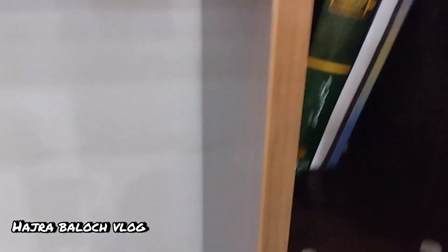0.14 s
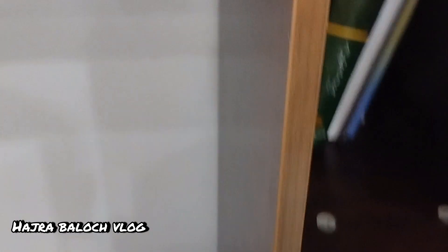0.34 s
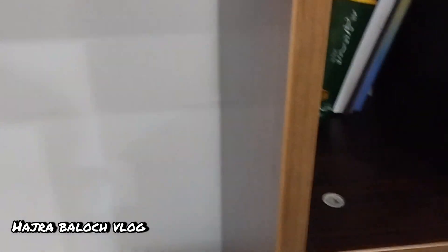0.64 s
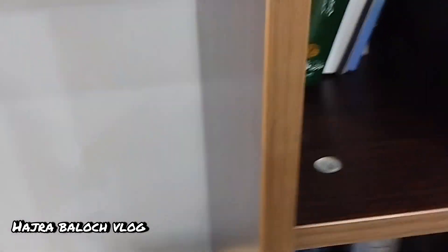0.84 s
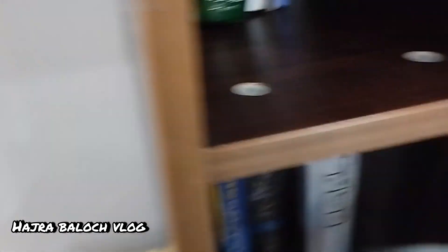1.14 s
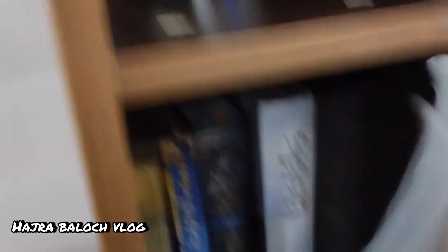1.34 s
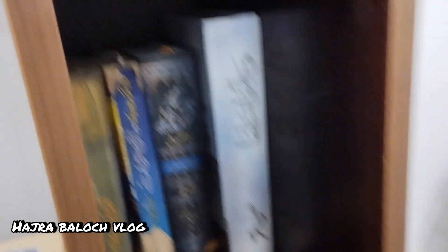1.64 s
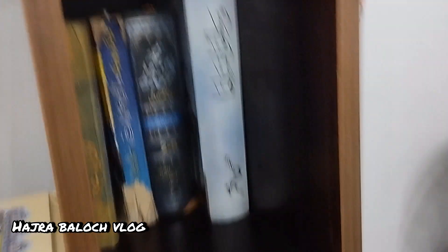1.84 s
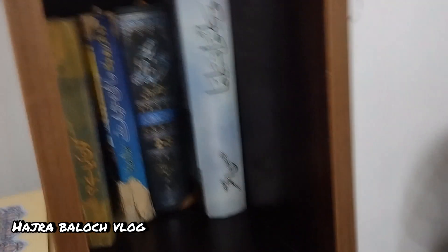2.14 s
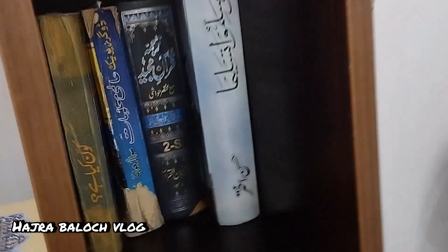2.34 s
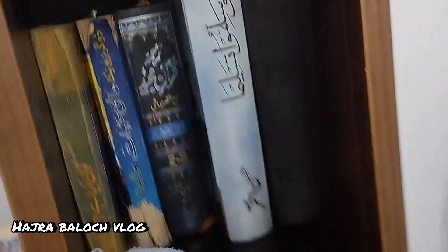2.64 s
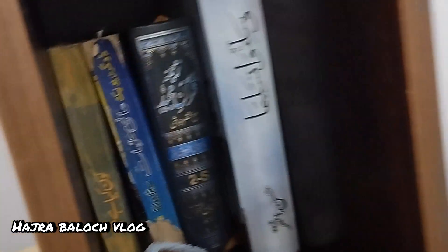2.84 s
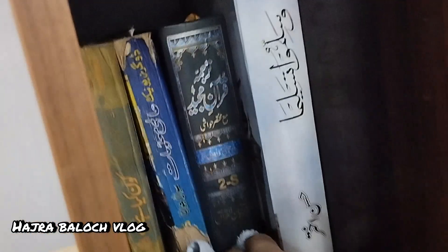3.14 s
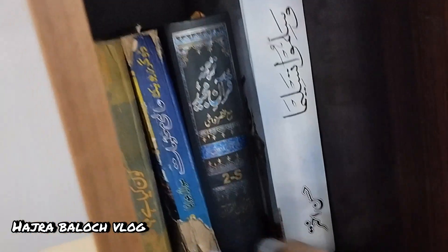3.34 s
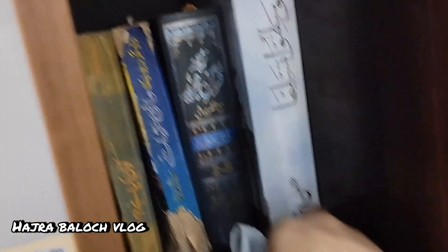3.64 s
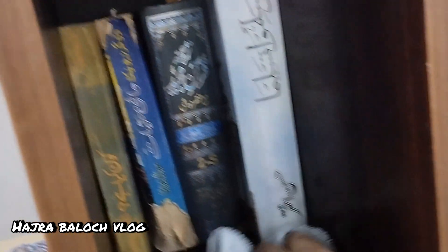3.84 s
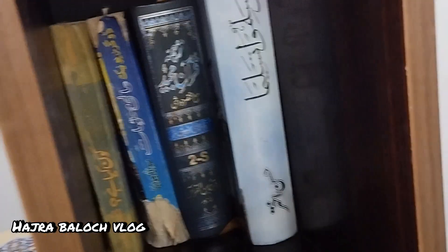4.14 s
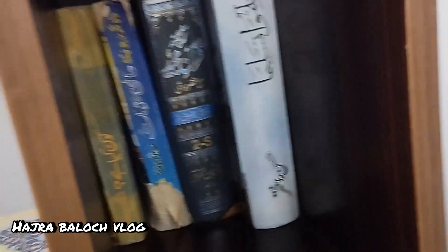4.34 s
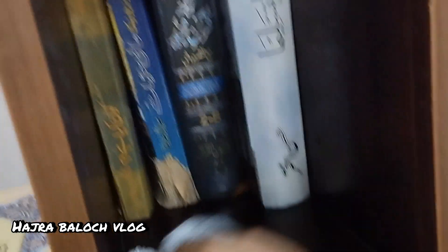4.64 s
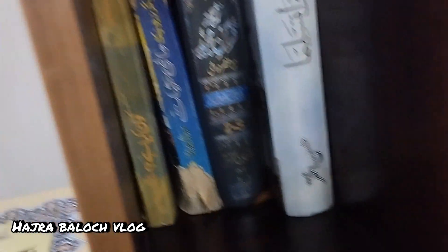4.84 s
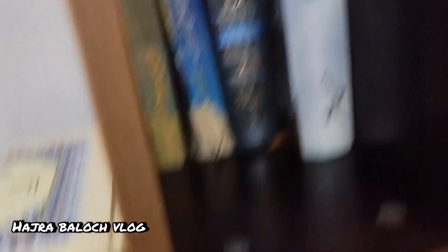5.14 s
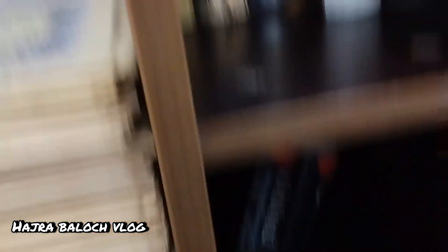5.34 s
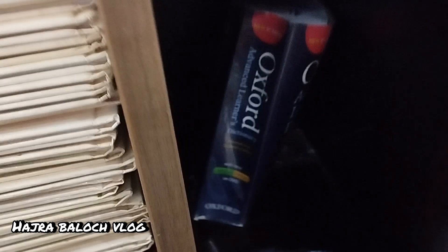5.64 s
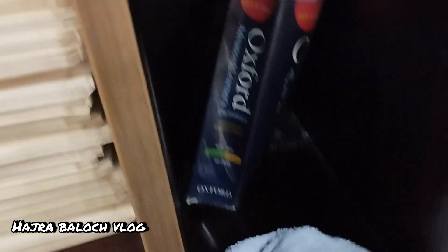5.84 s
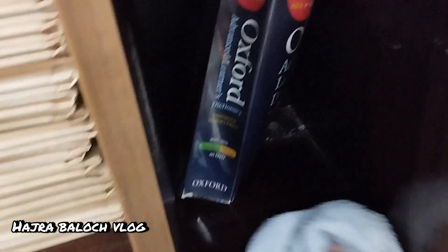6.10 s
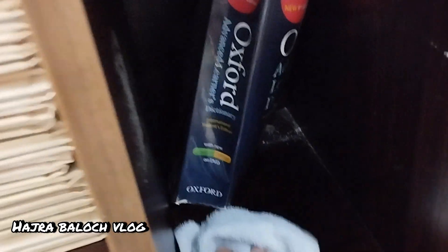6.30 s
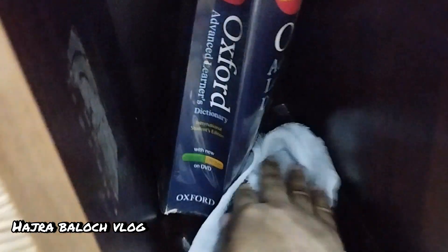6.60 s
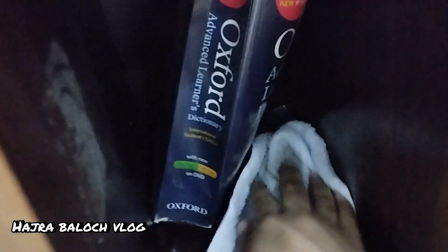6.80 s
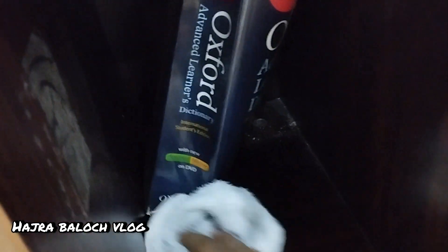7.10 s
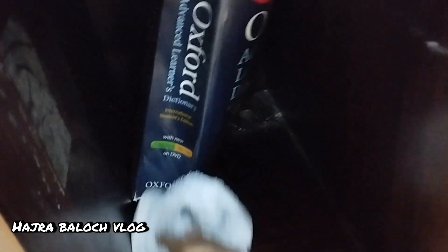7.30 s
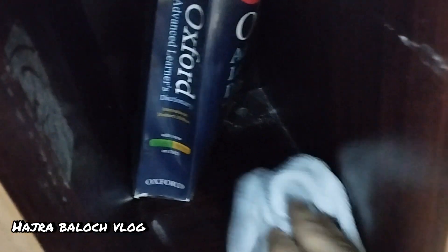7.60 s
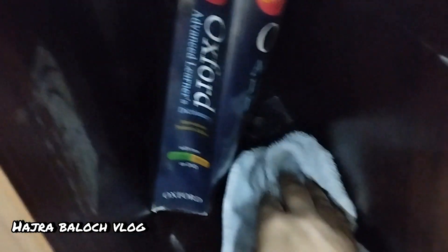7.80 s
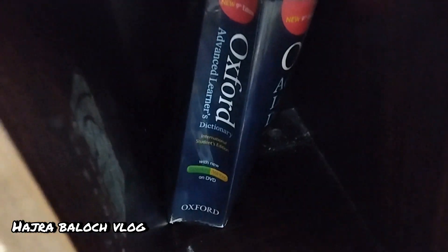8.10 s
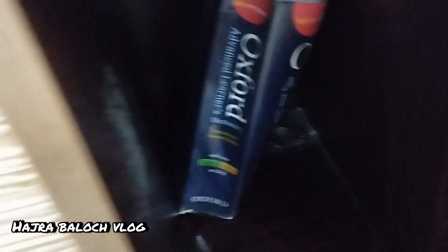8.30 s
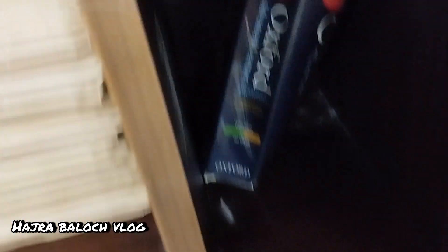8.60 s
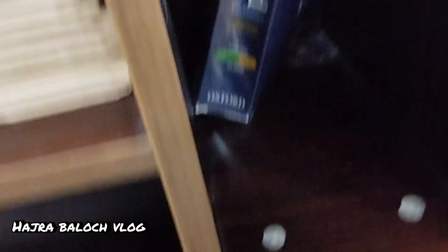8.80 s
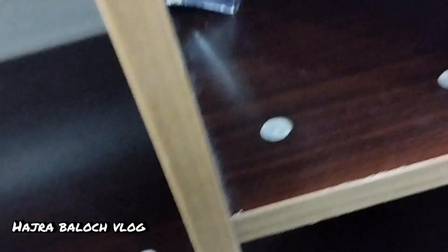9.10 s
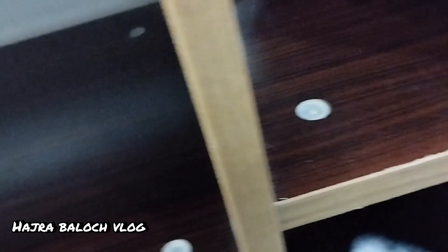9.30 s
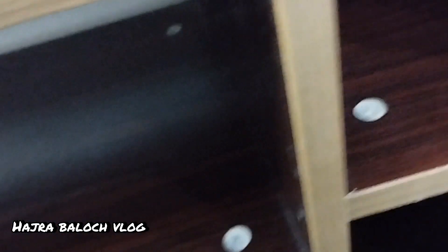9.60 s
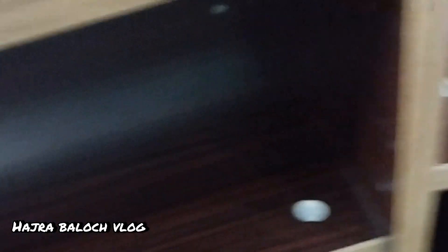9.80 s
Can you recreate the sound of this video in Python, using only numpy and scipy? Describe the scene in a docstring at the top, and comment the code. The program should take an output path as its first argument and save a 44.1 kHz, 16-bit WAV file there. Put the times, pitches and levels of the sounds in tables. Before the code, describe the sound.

Someone dusts a wooden bookcase indoors, heard from very near. It opens with three sharp, hollow knocks, each led by a little air thump on the microphone. Much quieter wiping follows: short swishes of cloth with a low rubbing drone from the shelves, a few brief scrapes, dull bumps and small clicks against books. The cloth snaps once late on. A faint low rumble fills the small room.

```python
"""A small room, close to a wooden book cabinet that is being dusted.
Three hard knocks come first, each led by a puff of air; they ring the frame, boards and thin panels.
Then a cloth wipes two shelves in short strokes: its fibres hiss, and scrape where it is pressed hard.
The boards drone under the cloth and thump when the hand bumps them.
Nails and book covers tick now and then, over the low rumble of the house."""
import sys
import numpy as np
from scipy import signal
from scipy.fft import rfft, irfft, next_fast_len
from scipy.io import wavfile
from scipy.ndimage import uniform_filter1d, map_coordinates

SR = 44100
rng = np.random.default_rng(int(sys.argv[2]) if len(sys.argv) > 2 else 0)


def log_audio(samples):
    """Write samples as a 16-bit WAV file to the path given in sys.argv[1]."""
    # one column per channel
    frames = np.atleast_2d(samples).T
    # limit to full scale, then quantise
    limited = np.clip(frames, -1, 1)
    pcm = np.round(limited * 32767).astype(np.int16)
    wavfile.write(sys.argv[1], SR, pcm)


N = 438794


# Wood hitting wood, several hits to a knock. A "fade" is the time a sound takes to drop by 60 dB.
# (time [s], thud [dB], boom [dB], clack [dB], crack [dB], board pitch [Hz], panel pitch [Hz],
# board fade [s])
HARD_HITS = [(0.201, -31.5, -31.5, -26, -39.5, 221, 470, 0.049),
             (0.2075, -32.5, -38.5, -31.5, -25, 244.6, 757, 0.28),
             (0.7644, -20, -27, -29.5, -44, 176, 414, 0.016),
             (0.769, -20, -35.5, -26, -32.5, 196, 464, .04), (0.807, -37, -21, -27.5, -35, 300, 527, 0.066),
             (0.81, -17.5, -23, -31, -33.5, 250, 603, 0.077),
             (1.3726, -30, -14, -36, -47, 251.8, 710, 0.092),
             (1.377, -42, -24.5, -39, -41.5, 258, 690, 0.043),
             (1.387, -42, -29.5, -28.5, -42.5, 243, 760, 0.061),
             (5.622, -32.5, -25, -47, -60.5, 228, 790, 0.057),
             (7.552, -35.5, -35.5, -44.5, -52.5, 210, 505, 0.064)]

def knocks(soft_db=14):
    """Each hit or bump cracks where it lands and rings the frame, the struck board and the panels."""
    track, t = np.zeros((2, N)), np.arange(int(SR * .35)) / SR
    for start, thud_db, boom_db, clack_db, crack_db, board_hz, panel_hz, fade in HARD_HITS + bumps():
        # a weak crack means a soft hit: it builds slowly, lasts longer and is duller
        softness = 0.5 + max(clack_db - crack_db, 0) / soft_db
        thud = amp(thud_db - 2) * frame_thud(t)
        boom = amp(boom_db - 2.78) * board_boom(t, board_hz, fade)
        clack = amp(clack_db - 1.4) * panel_clack(t, panel_hz, softness)
        crack = amp(crack_db + 2) * contact_crack(t, softness) * amp([[-1.4], [1.6]])
        add(track, start, echoed(thud + boom + clack, echo_db=-9.5) + echoed(crack, echo_db=-10))
    return track


# The frame's own notes: (pitch [Hz], level [dB], fade [s])
FRAME_NOTES = [(135, -1, 0.099), (169.3, -12.5, 0.23), (92.5, -2.5, 0.056)]

def frame_thud(t):
    """The whole frame shakes with a few low notes."""
    return ring(FRAME_NOTES, t, attack=0.00081, scatter_db=4.5, detune=0.012)


def board_boom(t, hz, fade, sag=.06, sag_s=0.023):
    """The struck board rings, and its pitch sags as its swing dies down."""
    notes = [(hz, 0, fade), (hz * 1.14, -13, 0.89 * fade)]
    sagging_time = t * (1 + sag * (sag_s - t) / (sag_s + t))
    return ring(notes, sagging_time, attack=0.0026, scatter_db=1.5, detune=0.016)


# Where a thin panel rings: (pitch [times the panel's pitch], width [Hz], level [dB])
PANEL_PEAKS = [(1, 95, 2), (.64, 55, -4.5), (1.5, 810, -18.5), (2.2, 910, -22)]

def panel_clack(t, hz, softness, base_fade=0.036, dull_hz=3200):
    """The brief push of a hit rings a thin panel."""
    onset = 1 - np.exp(-t / (0.00091 * softness))
    push = burst(t, base_fade * np.sqrt(softness))[:1] * onset
    peaks = [(hz * multiple, width, db) for multiple, width, db in PANEL_PEAKS]
    clack = filtered(push, lambda f: resonance(peaks, f) / (1 + 1j * f * softness / dull_hz) ** 2)
    return unit_start(clack)


# The crack's tone, from bass to treble: (frequency [Hz], level [dB])
CRACK_TONE = [(200, -24), (600, -2.5), (1000, 1), (1600, -2.5), (2000, 0.5), (2500, -2), (3200, 1),
              (4200, -5.5), (5200, -5), (7200, -15.5), (9300, -15), (11000, -20), (14500, -9)]

def contact_crack(t, softness, chatter_fade=0.035, snap_fade=0.0066, snap_db=6, bright_hz=24000):
    """The first touch is sharpest; the two surfaces then chatter for a moment."""
    chatter = burst(t, chatter_fade) + amp(snap_db) * burst(t, snap_fade)
    dulled = filtered(chatter, lambda f: 1 / (1 + 1j * f * softness ** 2 / bright_hz))
    crack = signal.fftconvolve(dulled, shortest_click(CRACK_TONE)[None], axes=1)
    return unit_start(crack[:, :len(t)])


# Soft bumps of the hand: (time [s], boom [dB], clack [dB], board pitch [Hz])
HAND_BUMPS = [(0.134, -43, -55.5, 195), (0.1887, -28.5, -45, 205), (0.7152, -38, -48.5, 189),
              (1.343, -38.5, -45.5, 194), (1.417, -29.5, -44, 223), (1.99, -32.5, -58, 274),
              (2.016, -36.5, -61, 203), (4.808, -45.5, -62, 298), (2.185, -59, -51.5, 273),
              (2.491, -40, -53, 306), (2.778, -42, -40, 290), (2.797, -45, -45, 292),
              (2.835, -42, -52, 193.5), (3.582, -44.5, -74, 181), (4.24, -45.5, -56, 295),
              (4.454, -57, -60.5, 280), (4.502, -46.5, -61, 264), (4.751, -43.5, -55, 296),
              (5.042, -39.5, -51, 294.6), (5.6, -40.5, -59, 269), (5.642, -35, -59, 245),
              (5.659, -36.5, -60, 270.6), (6.175, -43, -59, 239.5), (6.625, -44.5, -52, 244),
              (6.664, -41, -53.5, 239), (7.571, -35.5, -57, 246), (8.369, -33.5, -54, 253),
              (8.44, -34, -54.5, 257), (8.745, -46.5, -49, 215), (8.762, -46, -48, 184.5),
              (8.787, -49.5, -53.5, 183), (9.323, -51, -52, 288), (9.378, -46.5, -59, 194),
              (9.89, -47.5, -62.5, 361)]

def bumps(panel_ratio=2.4, mute_db=-25, frame_hz=194, db_per_octave=-25.5, fade=0.12):
    """List the padded hand's hits: they hardly crack, and lower ones shake the frame more."""
    hits = []
    for start, boom_db, clack_db, hz in HAND_BUMPS:
        thud_db = boom_db + db_per_octave * np.log2(hz / frame_hz)
        hits.append((start, thud_db, boom_db, clack_db, clack_db + mute_db, hz, panel_ratio * hz, fade))
    return hits


# Spots the hand works on, each with its own board and ringing hollow:
# (start [s], board pitch [Hz], hollow pitch [Hz], hollow width [Hz], hollow level [dB])
WIPED_SPOTS = [(0, 258, 2650, 507, -5.5), (2.319, 329.6, 729, 70.5, 1.5), (3.1, 296.2, 734, 55, 7),
               (5.4, 250.6, 1640, 918, -9), (8.56, 386, 578, 411, -5)]

def cloth(grip_db=3, board_width_hz=44):
    """The cloth's uneven drag makes the shelf drone, while the hollow colours its hiss."""
    hiss_db, scuff_db, drone_db = stroke_levels()
    hiss = fibre_hiss(hiss_db, scuff_db)
    drag = stereo(rng.standard_normal((2, N))) * amp(grip_db * wobble(90))
    rub = np.zeros((2, N))
    edges = [int(spot[0] * SR) for spot in WIPED_SPOTS] + [N]
    for (_, board_hz, *hollow), a, b in zip(WIPED_SPOTS, edges, edges[1:]):
        drone = unit(band(drag[:, a:b], board_hz, board_width_hz)) * amp(drone_db[a:b] - 1.4)
        rub[:, a:b] = drone + filtered(hiss[:, a:b], lambda f: 1 + resonance([hollow], f))
    return echoed(rub, echo_db=-11.5) * amp([[.4], [-.4]])


# Strokes of the cloth:
# (fastest moment [s], speeding up [s], slowing down [s], hiss [dB], scuff [dB], drone [dB])
CLOTH_STROKES = [(.16, 0.11, 0.11, -66, -69.5, -53), (.315, 0.028, 0.1, -58, -55.5, -50.5),
                 (.72, 0.2, 0.14, -67, -66.5, -61), (1.136, 0.07, 0.062, -58, -59, -65),
                 (1.26, 0.11, 0.36, -65, -60.5, -55), (1.57, 0.17, 0.25, -68.5, -72.5, -65.5),
                 (1.885, 0.11, 0.054, -66.5, -63.5, -57), (2.079, 0.21, 0.23, -71, -66.5, -53),
                 (2.561, 0.17, 0.29, -60.5, -59, -43.5), (2.791, 0.16, 0.069, -53, -55, -53),
                 (2.96, 0.05, 0.19, -62, -60.5, -58), (3.379, 0.14, 0.095, -62.5, -63, -55.5),
                 (3.589, 0.097, 0.041, -63.5, -66.5, -57), (4.0, 0.26, 0.072, -58.5, -61, -57),
                 (4.246, 0.17, 0.096, -57.5, -57, -48.5), (4.63, .14, 0.071, -63, -60, -52.5),
                 (4.79, 0.14, 0.11, -59.5, -61, -52.5), (5.051, 0.16, 0.056, -63.5, -62, -44.5),
                 (5.94, 0.087, 0.038, -63, -65, -56.5), (6.181, 0.13, 0.13, -62.5, -61.5, -49),
                 (6.39, 0.091, 0.15, -59, -58.5, -44.5), (6.65, 0.17, 0.04, -62, -58.5, -51.5),
                 (6.88, 0.28, 0.38, -62, -61.5, -57.5), (7.37, 0.17, 0.22, -61.5, -60, -53.5),
                 (7.64, .1, 0.13, -65.5, -60.5, -51), (8.0, 0.17, 0.096, -61, -60, -53.5),
                 (8.18, 0.28, 0.09, -65.5, -67, -55.5), (8.36, 0.14, 0.12, -58, -55.5, -45),
                 (9.06, 0.12, 0.065, -67.5, -67, -64), (9.379, 0.14, 0.086, -71, -66, -54.5),
                 (9.52, 0.093, 0.067, -60, -59, -59), (9.86, 0.31, 0.062, -66, -62.5, -64)]
# Each layer grows as the hand's speed raised to a power: (hiss [power], scuff [power], drone [power])
SPEED_POWERS = (0.8, 1.22, 2.3)

def stroke_levels(creep=.075, creep_s=.15):
    """Hiss, scuff and drone in dB: they swell as the hand speeds up and sink as it slows."""
    t = np.arange(0, N, 32) / SR
    energy = np.full((3, len(t)), 1e-12)
    for fastest, rise, fall, *levels_db in CLOTH_STROKES:
        progress = np.clip((t - fastest) / np.where(t < fastest, rise, fall), -1, 1)
        # the cloth creeps a little before and after the stroke
        creeping = creep * np.exp(-np.abs(t - fastest) / creep_s)
        speed = np.maximum(np.cos(np.pi / 2 * progress), creeping)
        energy += np.array([amp(db) * speed ** power for db, power in zip(levels_db, SPEED_POWERS)]) ** 2
    return [np.interp(np.arange(N) / SR, t, 10 * np.log10(layer)) for layer in energy]


# The tone of fibres sliding on wood: (frequency [Hz], level [dB])
FIBRE_TONE = [(100, 1.5), (190, 7.5), (420, 2.5), (680, 4), (1100, -1.5), (2200, -6), (5600, -9),
              (8200, -20), (9500, -14), (11200, -21), (13000, -11), (15500, -12)]

def fibre_hiss(hiss_db, scuff_db, catches_per_s=350, catch_db=-7, flutter_db=1.3, split_hz=2400):
    """Countless fibres slip and a few catch, making a low scuff and a fine, high hiss."""
    catches = tiny_catches(catches_per_s, N)
    slips = rng.standard_normal((2, N)) + amp(catch_db) * unit(catches)
    fibres = unit(filtered(stereo(hand_gap(slips)), lambda f: amp(along(FIBRE_TONE, f))))
    scuff = filtered(fibres, lambda f: treble_cut(f, split_hz))
    hiss = fibres - scuff
    return (hiss * amp(hiss_db) + scuff * amp(scuff_db)) * amp(5 + flutter_db * wobble(60))


def hand_gap(x, depth_db=2.0):
    """The gap under a moving hand keeps changing shape, so peaks come and go in the rub."""
    spectrum = signal.stft(x, nperseg=512)[2]
    patches = uniform_filter1d(rng.standard_normal(spectrum.shape[1:]), size=4, axis=0)  # across pitch
    patches = uniform_filter1d(patches, size=20, axis=1)  # across time
    return signal.istft(spectrum * amp(depth_db * unit(patches)), nperseg=512)[1][:, :N]


# Firm presses of the cloth: (middle [s], half length [s], level [dB], pitch [Hz])
FIRM_PRESSES = [(1.247, 0.055, -64, 4860), (2.718, .03, -51, 1200), (4.792, 0.055, -56, 1760),
                (5.645, .025, -60, 2820), (6.642, 0.035, -55, 2980)]

def scrapes(slips_per_s=2500, width_ratio=0.69):
    """Pressed hard, the cloth sticks and slips in a quick, uneven run of tiny catches."""
    track, t = np.zeros((2, N)), np.arange(8192) / SR
    for middle, half, db, hz in FIRM_PRESSES:
        rasp = band(tiny_catches(slips_per_s, len(t)), hz, width_ratio * hz)
        pressure = np.sin(np.pi / 2 * np.minimum(t / half, 2))
        add(track, middle - half, echoed(amp(db) * pressure * unit(rasp), echo_db=-11))
    return track


# Taps of nails, hard edges and book covers: (time [s], level [dB], pitch [Hz])
LIGHT_TAPS = [(0.142, -44, 1980), (0.207, -6.5, 3900), (1.494, -43, 2400), (1.6073, -42, 3180),
              (1.991, -43.5, 2760), (2.492, -42.5, 1820), (3.765, -50.5, 4000), (4.241, -36, 1290),
              (4.959, -53, 4500), (5.067, -45, 4000), (8.37, -37, 1306)]

def ticks(fade=0.014, width_hz=2200):
    """A light, hard touch makes a very short noise around one pitch."""
    track, t = np.zeros((2, N)), np.arange(SR // 4) / SR
    for start, db, hz in LIGHT_TAPS:
        touch = rng.standard_normal((2, len(t))) * amp(-60 * t / fade)
        tick = band(touch, hz, width_hz)
        add(track, start, echoed(amp(db) * tick / np.abs(tick).max(), echo_db=-15))
    return track


# Dry snaps in the cloth: (time [s], level [dB])
CLOTH_SNAPS = [(7.199, -38.5), (7.201, -38)]

def snaps(fade=0.033, bass_cut_hz=1500):
    """The cloth snaps with a broad, bright burst of noise."""
    track, t = np.zeros((2, N)), np.arange(SR // 4) / SR
    for start, db in CLOTH_SNAPS:
        noise = rng.standard_normal(len(t)) * amp(-60 * t / fade)
        snap = filtered(noise, lambda f: f / (f - 1j * bass_cut_hz))
        add(track, start, echoed(amp(db) * snap / np.abs(snap).max(), echo_db=-20))
    return track


# Air pushed across the microphone:
# (middle [s], half length [s], right level [dB], left compared with right [dB])
AIR_PUFFS = [(0.158, 0.013, -22, -24), (0.727, 0.0095, -16.5, -21), (1.336, 0.0049, -30, -2)]

def puffs():
    """A quick movement close by pulls and then pushes the air, mostly on the right."""
    track, t = np.zeros((2, N)), np.arange(N) / SR
    for middle, half, db, left_db in AIR_PUFFS:
        progress = (t - middle) / half
        track += amp([[db + left_db], [db]]) * progress * np.exp((1 - progress ** 2) / 2)
    return track


# How long the room's echo lasts: (frequency [Hz], fade [s])
ECHO_FADES = [(100, 0.32), (300, 0.31), (1000, 0.23), (4000, 0.22), (13000, 0.19)]

def echoed(x, echo_db, build_s=0.0016):
    """The room adds a short echo to a sound; the treble dies first."""
    hz, t, noise = signal.stft(rng.standard_normal((2, SR // 2)), SR, nperseg=256)
    fading = amp(-60 * t / along(ECHO_FADES, hz)[:, None])
    tail = signal.istft(noise * fading * (1 - np.exp(-t / build_s)), SR, nperseg=256)[1]
    tail = stereo(tail / np.linalg.norm(tail[0]))
    return x + amp(echo_db) * signal.fftconvolve(np.atleast_2d(x), tail, axes=1)[:, :x.shape[-1]]


# The tone of the quiet house: (frequency [Hz], level [dB])
HOUSE_TONE = [(25, -10), (44, 3), (72, -2), (125, -12), (290, -19), (420, -24.5), (850, -35), (3800, -43),
              (10000, -54.5), (15000, -47.5)]

def house_rumble(db=-50, drift_db=1.93):
    """The house rumbles low under a faint hiss, and the level drifts a little."""
    noise = filtered(stereo(rng.standard_normal((2, N))), lambda f: amp(along(HOUSE_TONE, f)))
    return amp(db + drift_db * wobble(2.7)) * unit(noise)


# How alike left and right sound: (frequency [Hz], likeness [0 to 1])
LIKENESS = [(60, 0.51), (300, 0.88), (640, 0.35), (1400, 0.081), (3000, 0.011)]

def stereo(pair):
    """Two unrelated signals become left and right: alike in the bass, unrelated in the treble."""
    angle = lambda hz: np.arccos(np.clip(along(LIKENESS, hz), -1, 1)) / 2
    mid, side = filtered(pair, lambda hz: np.array([np.cos(angle(hz)), np.sin(angle(hz))]))
    return np.array([mid + side, mid - side])


def ring(notes, t, attack, scatter_db, detune, side_db=1.47):
    """Fading notes, a little different on each hit and unequal in left and right."""
    total = 0
    for hz, db, fade in notes:
        level, shift, side = rng.standard_normal(3)
        wave = np.sin(2 * np.pi * hz * (1 + detune * shift) * t)
        note = amp(db + scatter_db * level - 60 * t / fade) * wave
        total = total + note * amp(side_db * side * np.array([[1], [-1]]))
    return unit_start(total * (1 - np.exp(-t / attack)))


def burst(t, fade):
    """Stereo noise that dies away."""
    return stereo(rng.standard_normal((2, len(t)))) * amp(-60 * t / fade)


def tiny_catches(per_s, size):
    """Clicks at random times, with random strengths."""
    return (rng.random(size) < per_s / SR) * rng.standard_normal((2, size))


def shortest_click(tone, size=2048):
    """The shortest click that has this tone, with energy 1."""
    cepstrum = irfft(np.log(amp(along(tone, np.fft.rfftfreq(size, 1 / SR)))))
    # folding the second half onto the first moves the energy to the start
    cepstrum[1:size // 2] *= 2
    cepstrum[size // 2 + 1:] = 0
    click = irfft(np.exp(rfft(cepstrum)))
    return click / np.linalg.norm(click)


def resonance(peaks, f):
    """How something with these ringing peaks answers at frequency f."""
    return sum((-1) ** k * amp(db) * 1j * f * width / (hz * hz - f * f + 1j * f * width)
               for k, (hz, width, db) in enumerate(peaks))


def treble_cut(f, hz):
    """A gain that falls away above hz."""
    return 1 / (1 + (f / hz) ** 4)


def band(x, hz, width):
    """Keep the part of a sound around one pitch."""
    return filtered(x, lambda f: resonance([(hz, width, 0)], f) * treble_cut(f, 2 * hz))


def filtered(x, response):
    """Apply a gain that depends on frequency."""
    n = x.shape[-1]
    padded = next_fast_len(n + SR // 10)
    return irfft(rfft(x, padded) * response(np.fft.rfftfreq(padded, 1 / SR)), padded)[..., :n]


def wobble(rate):
    """A smooth random curve through rate points a second."""
    return map_coordinates(rng.standard_normal(int(N * rate / SR) + 4), [np.arange(N) * rate / SR])


def along(points, hz):
    """Read between (frequency, value) points on a log axis."""
    f, values = np.transpose(points)
    return np.interp(np.log(hz + 1), np.log(f + 1), values)


def amp(db):
    """Decibels to gain."""
    return 10 ** (np.asarray(db) / 20)


def unit(x):
    """Scale to an average (rms) level of 1."""
    return x / np.sqrt(np.mean(x ** 2) + 1e-20)


def unit_start(x):
    """Scale so the first 30 ms have an average (rms) level of 1."""
    return x / np.sqrt(np.mean(x[..., :int(.03 * SR)] ** 2) + 1e-20)


def add(track, start, sound):
    """Mix a sound into the track at a time in seconds."""
    part = track[:, max(round(start * SR), 0):][:, :sound.shape[-1]]
    part += sound[..., :part.shape[-1]]


def scene():
    """Everything heard at the cabinet."""
    return knocks() + ticks() + snaps() + puffs() + cloth() + scrapes() + house_rumble()


def record(dry):
    """The very highest treble is cut off."""
    top_hz = 15950
    return filtered(dry, lambda hz: 1 / (1 + (hz / top_hz) ** 300))


dry = scene()
out = record(dry)
log_audio(out)
```